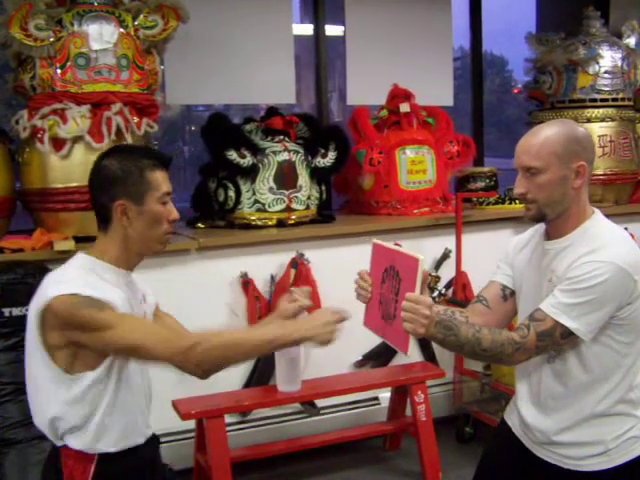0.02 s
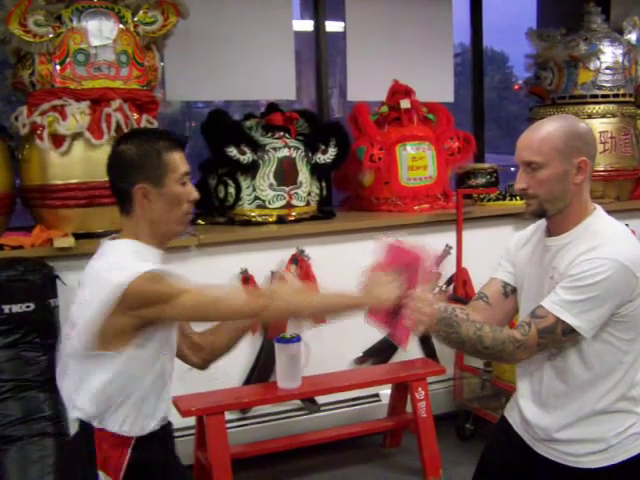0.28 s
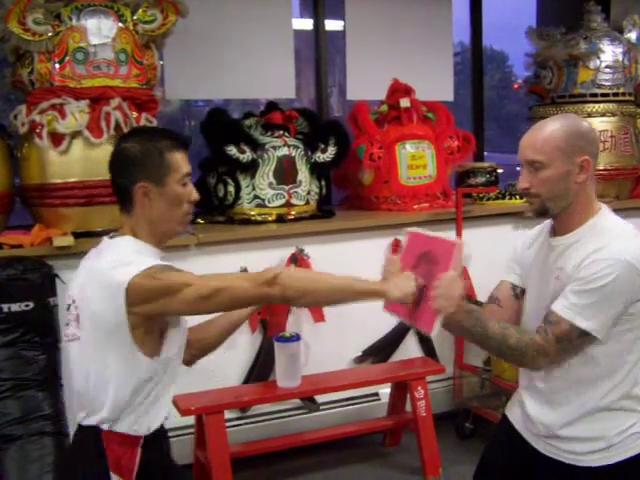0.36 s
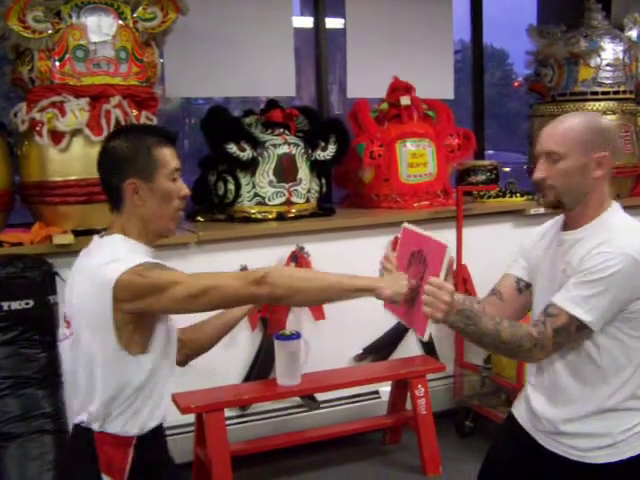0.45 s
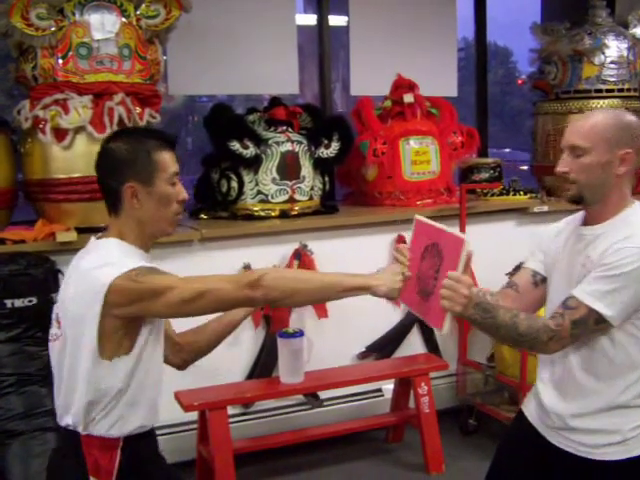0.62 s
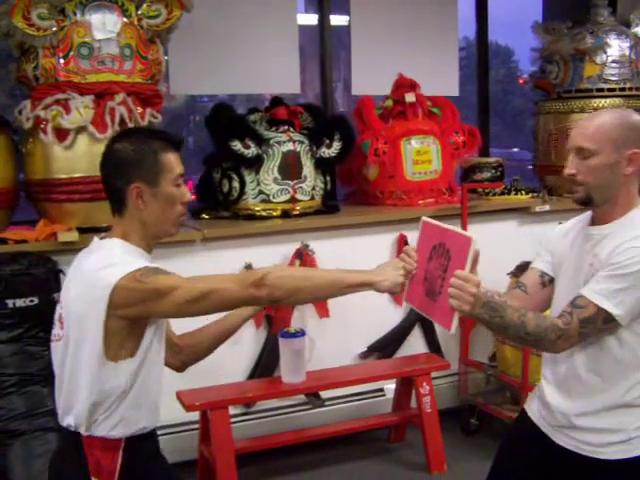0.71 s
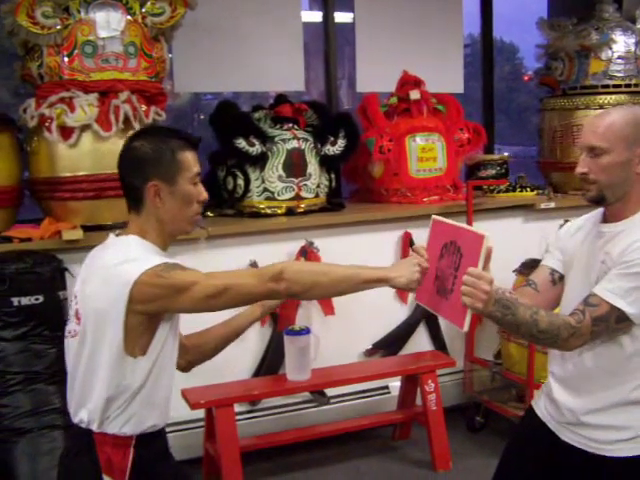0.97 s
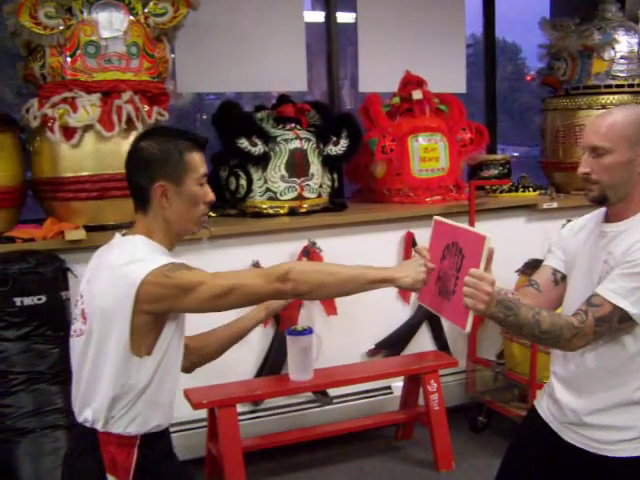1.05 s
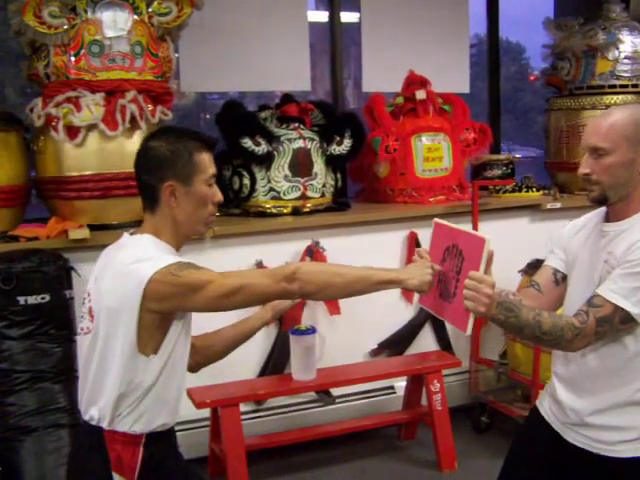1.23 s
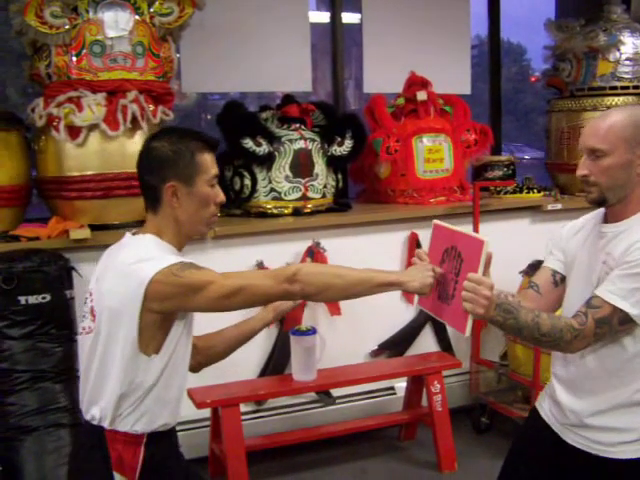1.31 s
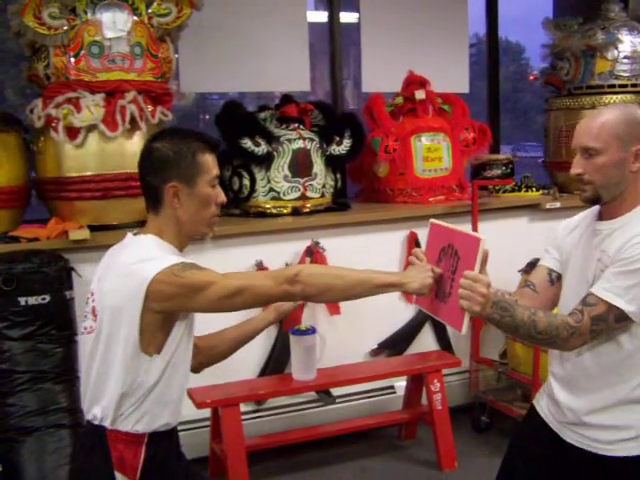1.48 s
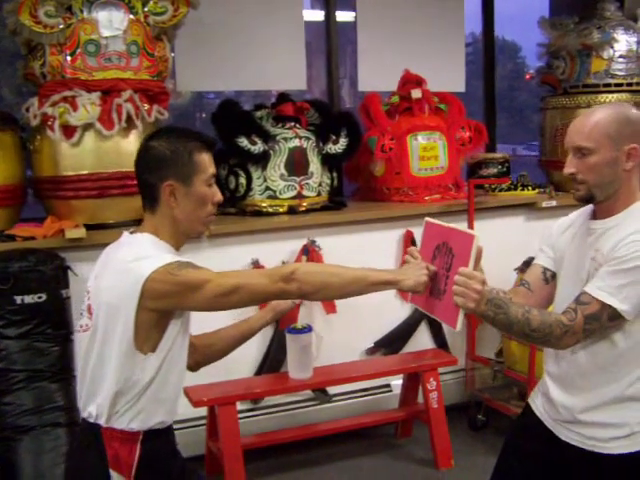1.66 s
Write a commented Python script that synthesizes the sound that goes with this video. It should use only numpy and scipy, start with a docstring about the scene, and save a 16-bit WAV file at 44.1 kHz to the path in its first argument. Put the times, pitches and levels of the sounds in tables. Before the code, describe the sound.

A fist hits a hand-held plastic board once with a sharp, slapping crack that briefly overloads the microphone. The hard-walled room echoes and rings for a moment, leaving quiet room tone and a low electrical hum.

```python
"""A hard-walled training room, where a fist strikes a hand-held plastic board once.
The board gives a short, damped ring under a slap of skin, and the crack briefly overloads the mic.
The walls throw it back as echoes, a diffuse tail and standing waves that ring for about half a second.
Underneath sit steady room tone, a low electrical hum and one tiny tick."""
import sys
import numpy as np
from scipy import signal
from scipy.fft import rfft, irfft
from scipy.io import wavfile

SR = 44100
rng = np.random.default_rng(int(sys.argv[2]) if len(sys.argv) > 2 else 0)


def dump(signal):
    """Clip the signal to [-1, 1] and save it as 16-bit WAV at the path in sys.argv[1]."""
    limited = np.clip(np.atleast_2d(signal).T, -1, 1)
    pcm = np.round(limited * 32767).astype(np.int16)
    wavfile.write(sys.argv[1], SR, pcm)


N = 74970

# Colour of the room tone. Each row: frequency in Hz, relative level in dB.
ROOM_TONE_SPECTRUM = [(15, 4), (28, -9), (80, -4), (140, -6), (200, -10), (320, -10), (450, -16.5),
                      (620, -14), (1000, -20), (2000, -24), (4700, -19.5), (6000, -27), (7500, -30.5),
                      (9000, -32)]
# Partials of the hum. Each row: frequency in Hz, rms level in dB before any swell.
HUM_PARTIALS = [(59.6, -51), (178, -62), (240, -56.5)]
# Fader ride on the lowest hum partial. Each row: time in seconds, gain in dB.
HUM_SWELL = [(0, -1), (.1, 5), (.3, -12), (.38, 5.5), (.6, 1), (.78, -9), (.87, 4.5), (1.27, 6), (1.39, -3),
             (1.48, 2.5), (1.7, -5.5)]
# Standing waves. Each row: pitch in Hz, level in dB, build-up in seconds, T60 in seconds.
ROOM_MODES = [(298, -32.5, 0.14, 0.24), (334, -29, 0.081, 0.73), (418.4, -35.5, 0.079, 0.83),
              (494.8, -38, 0.15, 0.75), (577, -29.5, .1, .55), (578, -28.5, .11, 0.64),
              (634.6, -22.5, 0.027, 0.7), (665.6, -25.5, 0.091, 0.5), (799.6, -33, 0.035, 0.37),
              (852, -29, 0.013, 0.58), (913, -29, 0.065, .6), (983, -25, 0.036, 0.31),
              (1936, -39, 0.024, 0.85)]
# Colour of the reverb tail. Each row: frequency in Hz, relative level in dB.
TAIL_SPECTRUM = [(60, -32.5), (130, -24.5), (240, -21), (320, -10), (430, -11), (590, -1.5), (740, -3.5),
                 (920, -6), (1150, -10), (1550, -13.5), (1880, -7), (2300, -12), (2800, -9), (3850, -10.5),
                 (4400, -15.5), (6300, -33), (8000, -43)]
# Sustain of the tail. Each row: frequency in Hz, hold in seconds.
TAIL_HOLD = [(300, 0.14), (600, 0.13), (1000, 0.082), (2000, 0.082), (4000, 0.015), (7000, 0.0094)]
# Decay of the tail after its hold. Each row: frequency in Hz, T60 in seconds.
TAIL_T60 = [(100, 0.93), (300, 0.76), (600, 0.5), (1000, 0.61), (2000, 0.43), (4000, 0.49), (7000, 0.86)]
# Clumps of early reflections in the tail. Each row: time after the hit in seconds, gain in dB.
TAIL_CLUMPS = [(0, 7), (.024, -4.5), (.029, -0.5), (.038, -5.5), (.046, -4.5), (.06, -4.5), (.067, -1.5),
               (.104, -0.5), (.113, -5), (.15, -2.5), (.22, 0), (.3, -1)]
# Distinct echoes. Each row: delay in seconds, gain in dB, low-pass cutoff in Hz.
WALL_ECHOES = [(.0062, -16, 5000), (0.013, -20, 4500), (0.0212, -20.5, 4500), (0.0314, -12.5, 1400),
               (0.0379, -17.5, 1200), (0.0389, -11.5, 1400), (0.066, -17, 3500), (0.074, -17, 2000),
               (.0925, -22, 1000), (0.1037, -19.5, 1100)]
# Colour of skin slapping plastic. Each row: frequency in Hz, relative level in dB.
SLAP_SPECTRUM = [(60, -19), (150, -14.5), (350, 2), (900, 7.5), (2000, -7), (3500, -2.5), (5000, -3.5),
                 (7000, -22.5), (8200, -28.5)]
# Modes of the board. Each row: pitch in Hz, relative level in dB, T60 in seconds.
BOARD_MODES = [(382, -0.5, 0.018), (874, 5.5, 0.016), (1311, -0.5, 0.016), (2051, 4.5, 0.019),
               (2538, -2.5, 0.027), (2830, -2.5, 0.023), (3324, -3.5, 0.022), (5250, 0.5, 0.0091),
               (6687, -8, 0.012)]
# EQ that softens the clipped crack. Each row: frequency in Hz, gain in dB.
TREBLE_SHELF = [(2500, 0), (6800, -3), (8400, -9), (10000, -12), (15500, -9)]

PUNCH_S, TICK_S = .2158, .893
ROOM_TONE_DB, TICK_DB, TAIL_DB, SLAP_DB, RING_DB = -47, -38, -15, -5, -3
HUM_WAVER_DEPTH, HUM_WAVER_HZ = 0.39, 4.6
CONTACT_S, SLAP_HOLD_S, TAIL_RISE_S = .0005, .003, .0033
MIC_BAND_HZ, CLIP_LEVEL, OUTPUT_BAND_HZ = 7900, .68, 16200


def amp(db):
    """Decibels to gain."""
    return 10 ** (np.asarray(db) / 20)


def unit_rms(x):
    """Scales to unit rms."""
    return x / np.sqrt(np.mean(abs(x) ** 2) + 1e-20)


def curve_at(points, hz):
    """Reads a table on a log-frequency axis."""
    f, value = np.transpose(points)
    return np.interp(np.log(hz + 1), np.log(f + 1), value)


def noise(spectrum):
    """Unit-rms noise with the given colour."""
    gain = amp(curve_at(spectrum, np.fft.rfftfreq(N, 1 / SR)))
    return unit_rms(irfft(rfft(rng.standard_normal(N)) * gain, N))


def decay(t, t60):
    """Holds until t = 0, then falls 60 dB every t60 seconds."""
    return np.exp(-np.log(1000) * np.maximum(t, 0) / t60)


def delayed(x, seconds):
    """The same sound, later."""
    return np.concatenate([np.zeros(round(seconds * SR)), x])[:N]


def gentle_pass(x, kind, hz):
    """Low- or high-pass at 12 dB per octave."""
    return signal.sosfilt(signal.butter(2, hz, kind, fs=SR, output="sos"), x)


def band_limit(x, hz, taps):
    """Steep low-pass."""
    return signal.oaconvolve(x, signal.firwin(taps, hz, window="blackman", fs=SR), "same")


def room_tone():
    """A steady, bass-heavy bed of noise."""
    return amp(ROOM_TONE_DB) * noise(ROOM_TONE_SPECTRUM)


def hum(t):
    """Low electrical hum: its partials waver and the lowest swells and sinks."""
    slow_band = np.exp(-(np.fft.fftfreq(N, 1 / SR) / HUM_WAVER_HZ) ** 2)
    partials = []
    for hz, db in HUM_PARTIALS:
        waver = unit_rms(np.fft.ifft(slow_band * np.exp(2j * np.pi * rng.random(N))))
        tone = (1 + HUM_WAVER_DEPTH * waver) * np.exp(2j * np.pi * hz * t)
        partials.append(amp(db) * unit_rms(tone.real))
    swell = amp(np.interp(t, *np.transpose(HUM_SWELL)))
    return partials[0] * swell + sum(partials[1:])


def tick(t):
    """One tiny, dry tick of white noise."""
    return amp(TICK_DB) * rng.standard_normal(N) * decay(t, t60=.004)


def room_ring(t):
    """Standing waves bloom between the walls and linger."""
    ring = np.zeros(N)
    for hz, db, rise, t60 in ROOM_MODES:
        envelope = np.minimum(t / rise, 1) * decay(t - rise, t60)
        ring += amp(db) * envelope * np.sin(2 * np.pi * (hz * t + rng.random()))
    return ring


def reverb_tail(t):
    """Dense reflections arrive in clumps and hold a moment, then each band dies at its own speed."""
    frames = dict(fs=SR, nperseg=512, noverlap=384)
    hz, frame_s, bands = signal.stft(noise(TAIL_SPECTRUM), **frames)
    hold = curve_at(TAIL_HOLD, hz)[:, None]
    t60 = curve_at(TAIL_T60, hz)[:, None]
    wash = signal.istft(bands * decay(frame_s - hold, t60), **frames)[1][:N]
    clumps_db = np.interp(t, *np.transpose(TAIL_CLUMPS))
    attack = np.minimum(t / TAIL_RISE_S, 1)
    return amp(TAIL_DB + clumps_db) * attack * wash


def wall_echoes(crack):
    """Floor and walls throw back thinner, duller copies of the crack."""
    thin = gentle_pass(crack, "high", hz=298)
    return sum(amp(db) * delayed(gentle_pass(thin, "low", hz), delay) for delay, db, hz in WALL_ECHOES)


def board_crack(t):
    """The fist rings the hand-damped board briefly, under a slap of skin."""
    ring = sum(amp(db) * decay(t, t60) * np.sin(2 * np.pi * hz * t) for hz, db, t60 in BOARD_MODES)
    slap = noise(SLAP_SPECTRUM) * decay(t - SLAP_HOLD_S, t60=.018)
    attack = np.minimum(t / CONTACT_S, 1)
    return attack * (amp(RING_DB) * ring + amp(SLAP_DB) * slap)


def scene():
    """The punch and the room's answer over a quiet bed, in mono."""
    t = np.arange(N) / SR
    crack = board_crack(t)
    punch = crack + wall_echoes(crack) + reverb_tail(t) + room_ring(t)
    bed = room_tone() + hum(t) + delayed(tick(t), TICK_S)
    return (bed + delayed(punch, PUNCH_S))[None]


def record(dry):
    """A narrow-band mic input clips on the crack; a treble shelf and a low-pass take the edge off."""
    mic = band_limit(dry[0], MIC_BAND_HZ, taps=91)
    clipped = np.clip(mic, -CLIP_LEVEL, CLIP_LEVEL)
    shelf = amp(curve_at(TREBLE_SHELF, np.fft.rfftfreq(2 * N, 1 / SR)))
    softened = irfft(rfft(clipped, 2 * N) * shelf)[:N]
    return band_limit(softened, OUTPUT_BAND_HZ, taps=255)[None]


dry = scene()
out = record(dry)
dump(out)
```